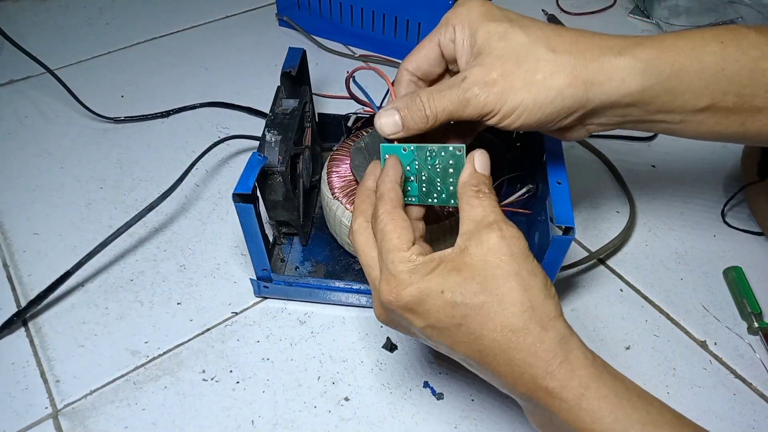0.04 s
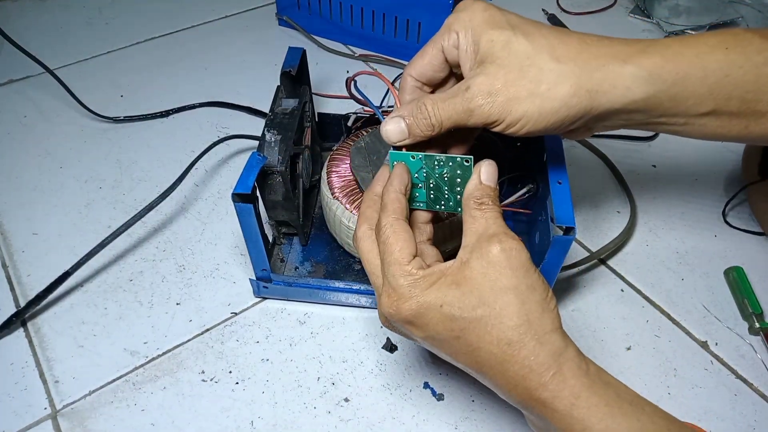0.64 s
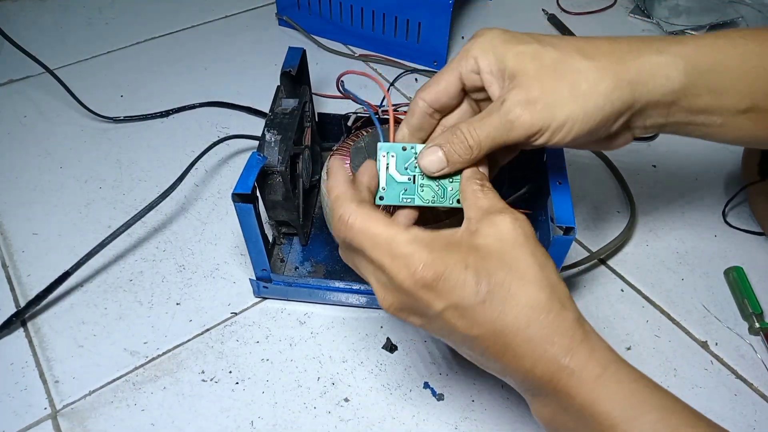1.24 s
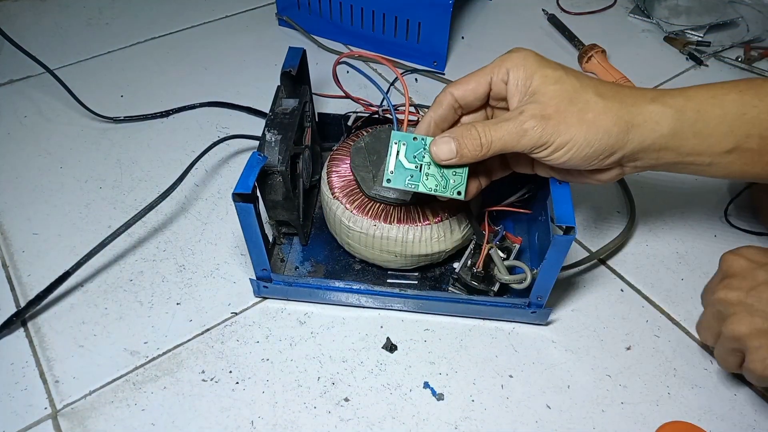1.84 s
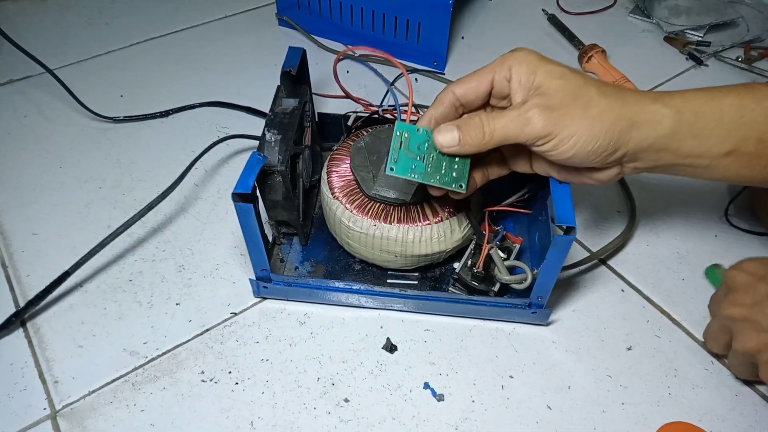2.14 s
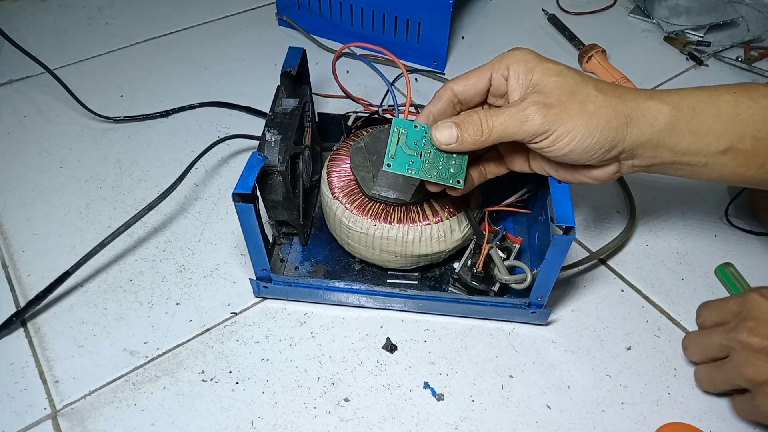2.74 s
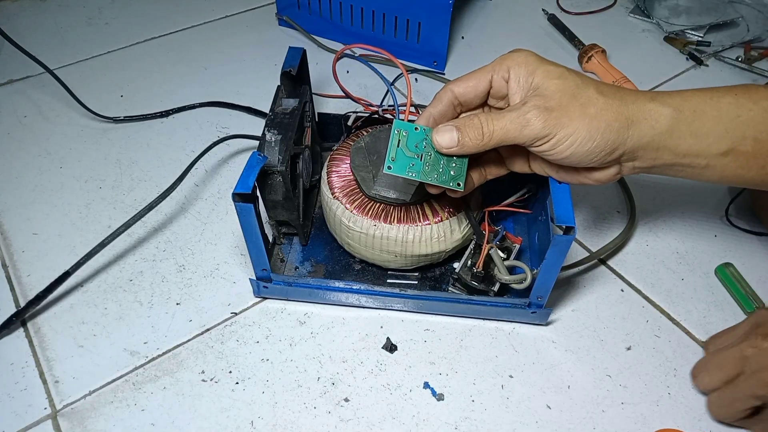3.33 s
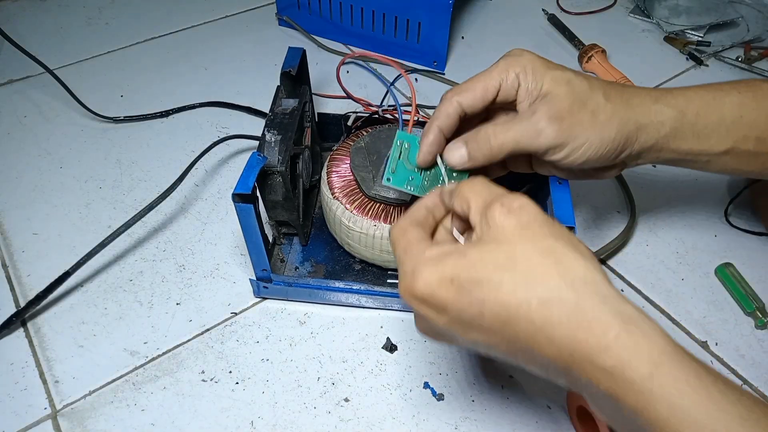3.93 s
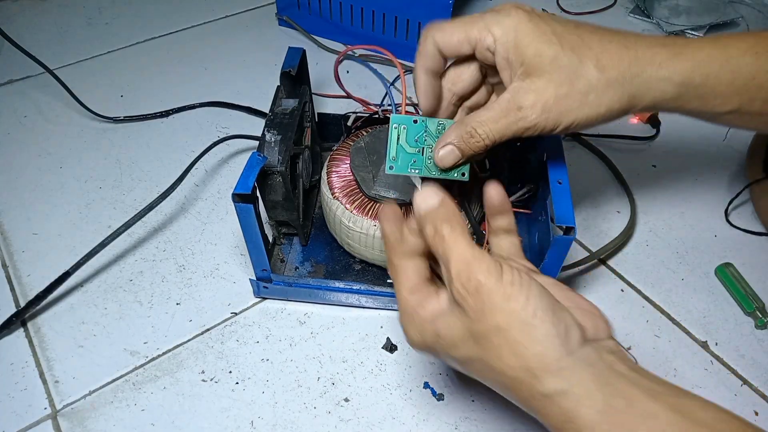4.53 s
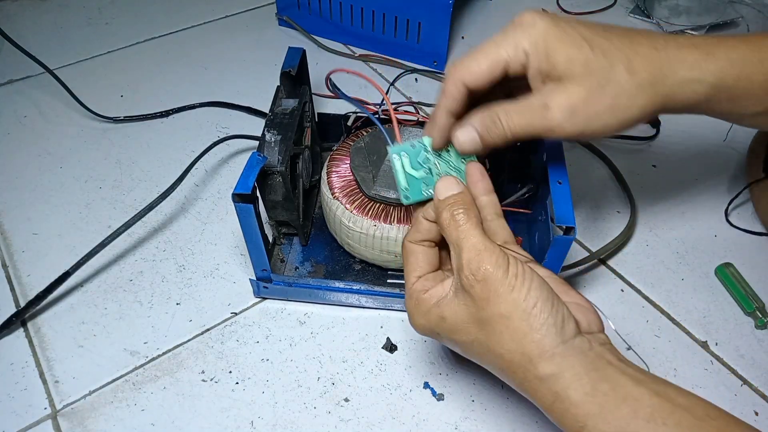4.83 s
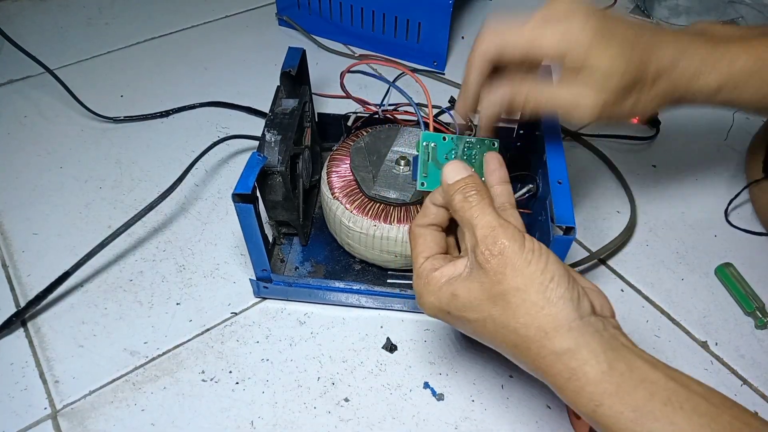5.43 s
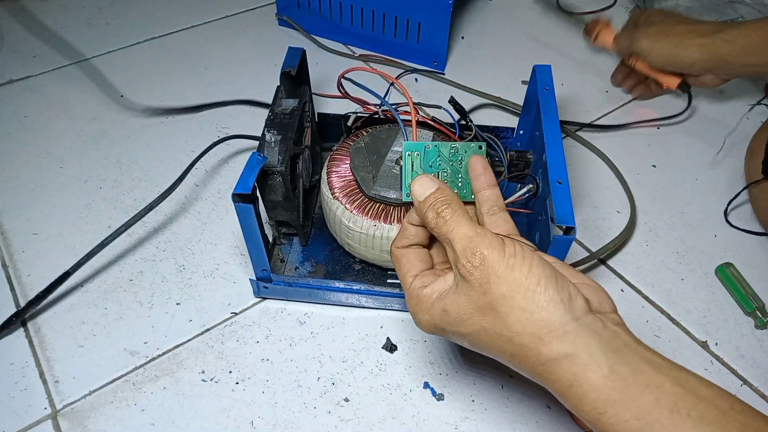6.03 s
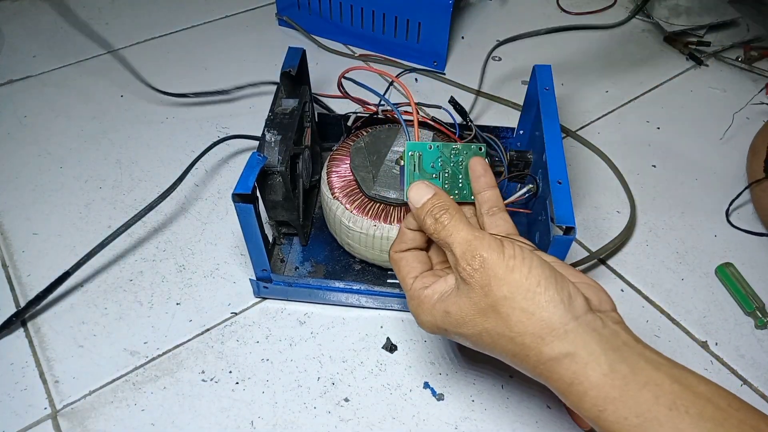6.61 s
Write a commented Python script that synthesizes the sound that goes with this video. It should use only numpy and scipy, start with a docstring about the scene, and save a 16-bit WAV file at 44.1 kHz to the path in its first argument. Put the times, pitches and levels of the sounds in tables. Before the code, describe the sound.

Fingers turn a small circuit board over with faint slides and one sharp little snap. About two seconds in, a hand tool clatters onto a tiled floor, bouncing with a brief ring, then is nudged across it in short, stuttering scrapes. Light ticks from the board, wire ends and a soldering iron follow. Arms rustle softly, and everything sounds close over the low hum of a small room.

```python
"""A hand tool clatters onto the tiled floor of a small room and is pushed, stuttering, over the glaze.
It is repair work: a circuit board is turned over above an open amplifier case, and board, wires and
soldering iron tick. Each contact is a burst of noise with ringing modes; scrapes are tiny friction slips.
Fingers slide, squeak and bump softly, and arms rustle over a quiet room tone."""
import sys
import numpy as np
from scipy import signal
from scipy.fft import rfft, irfft, next_fast_len
from scipy.io import wavfile

SR = 44100
rng = np.random.default_rng(int(sys.argv[2]) if len(sys.argv) > 2 else 0)


def persist_wave(psi):
    """Save psi, clipped to +-1, as 16-bit WAV."""
    counts = np.round(np.clip(psi, -1, 1) * 32767).astype(np.int16)
    wavfile.write(sys.argv[1], SR, np.atleast_2d(counts).T)


N = 293970
TIME = np.arange(N) / SR

# The tool's ring, struck or scraped. Each row: pitch in Hz, relative level in dB, t60 in seconds.
TOOL_MODES = [(246.4, -1, 0.15), (320.3, -2, .25), (352, 3.5, 0.155), (634, -12, 0.13), (1207, -7.5, 0.15),
              (1778, -9, .17), (2151, -6.5, 0.18), (2248, -11, 0.18), (2270, -5.5, 0.22),
              (2480, -5, 0.1615), (2656, 6.5, 0.12), (3000, -2, 0.17), (3100, -3.5, 0.211),
              (3140, -6.5, 0.12), (3305, -0.5, .18), (3450, 5, 0.099), (3580, -9.5, 0.15),
              (3770, -4.5, 0.179), (4113, -4, 0.14), (4580, -8, 0.14), (5820, -8.5, .15),
              (7810, 3.5, 0.068), (9200, 3.5, .06), (9550, 5, .08), (10080, 3, .13), (10595, -6, 0.1315),
              (11005, -4, 0.12), (12980, -11.5, .08), (15080, -4.5, 0.063)]


def tool_clatter():
    """The tool bounces on the tiles and rings; its handle clacks lower than its shaft."""
    # Each row: start in seconds, thud, clack and treble splash in relative dB, burst t60 in seconds,
    # clack centre in Hz, ring against the burst in dB.
    knocks = [(2.148, -41, -31.5, -56, 0.03, 2100, -29), (2.1555, -39, -40, -46, 0.032, 2450, -8.5),
              (2.1782, -34.5, -33, -55, 0.032, 2260, -11.5), (2.191, -32, -26, -46, 0.019, 2150, -19),
              (2.195, -32.5, -41, -40, 0.0097, 2200, -13), (2.2203, -27, -27, -16, 0.027, 3300, -36),
              (2.2299, -49, -25, -33, 0.025, 3383, -31), (2.235, -50, -33, -45, .02, 2700, -17),
              (2.2835, -43, -35.5, -37, 0.02, 2950, -24), (2.290, -43, -40, -38, 0.021, 2820, -15.5),
              (2.3277, -45, -40, -34, 0.053, 2960, -39), (2.357, -46.5, -44, -44, 0.013, 3200, -22),
              (2.432, -48, -37.5, -25, 0.013, 2940, -19), (2.4388, -58, -34.5, -33.5, 0.022, 3050, -12.5),
              (2.773, -76, -37.5, -34.5, 0.034, 3000, -17)]
    # Tone of the burst. Each row: frequency in Hz, gain in dB.
    colour = [(70, -24.5), (140, 3), (320, -4), (560, -6), (1450, -13.5), (2200, 1.5), (3500, 6.5),
              (5400, -6.5), (7200, -3.5), (7750, 0.5), (10500, 2.5), (12100, -6.5), (13000, -4),
              (15500, -9)]
    return impacts(knocks, TOOL_MODES, colour, focus_db=10.5, focus_width_hz=720, rise_s=0.00062,
                   crack_db=6, crack_t60=0.014, hollow_db=5, thud_hz=1320, splash_hz=5726)


def tool_scrape():
    """The tool stutters over the glaze, and the slips keep its modes sounding."""
    # Each row: start in seconds, hold in seconds, relative level in dB.
    pushes = [(2.61, 0.061, -57.5), (3.0, 0.042, -56.5), (3.035, 0.046, -53.5), (3.23, 0.054, -68),
              (3.365, 0.032, -57.5), (3.435, 0.03, -62.5), (3.645, .06, -53), (3.728, 0.0073, -49)]
    # Tone of the scrape. Each row: frequency in Hz, gain in dB.
    colour = [(1200, -43), (2100, -6.5), (2500, -12.5), (3150, -0.5), (3600, -5.5), (4200, -14),
              (5700, -21.5), (8200, -20), (9300, -4.5), (9900, -10), (10600, -15.5), (12500, -18.5),
              (15500, -26)]
    stutter_db = 6.5 * np.tanh(rms_one(band(rng.standard_normal(N), [40, 220], "band")))
    slips = grains(per_s=5000, spread_db=2.5) * from_db(stutter_db)
    ring = sum(from_db(db) * resonance(slips, hz, width_hz=45) for hz, db, _ in TOOL_MODES)
    scrape = coloured(slips + from_db(-0.5) * ring, colour)
    return envelope(pushes, rise_db_per_s=680, fall_db_per_s=750) * scrape


def part_ticks():
    """Board, wire ends and soldering iron tick and ring at each light contact."""
    # Each row: start in seconds, thud, clack and treble splash in relative dB, burst t60 in seconds,
    # clack centre in Hz, ring against the burst in dB.
    ticks = [(.82, -76, -76, -74, 0.028, 2940, -21), (2.931, -56, -67.5, -64.5, 0.051, 2170, -12),
             (3.004, -78, -66, -61, 0.046, 3040, -20), (3.444, -74, -59, -70, 0.032, 3200, -15),
             (3.638, -76, -76, -52.5, 0.018, 3300, -22), (3.7238, -67, -51, -56, 0.03, 3100, -7.5),
             (3.809, -77, -50.5, -53, 0.026, 3650, -25), (3.959, -51, -52.5, -64.5, 0.019, 2160, -22),
             (3.977, -61.5, -63, -65, 0.069, 2200, -17), (4.512, -78.5, -57, -50.5, 0.015, 3000, -28),
             (4.92, -77, -68.5, -73, 0.024, 2920, -27), (5.909, -81, -68, -67.5, 0.019, 2940, -18),
             (6.243, -70, -41, -49.5, 0.043, 2820, -9), (6.51, -58.5, -47.5, -64, 0.031, 2290, -33),
             (6.541, -57, -56.5, -61, 0.015, 3900, -11.5), (6.586, -68, -44.5, -73, 0.014, 2500, -24)]
    # Ring of the small parts. Each row: pitch in Hz, relative level in dB, t60 in seconds.
    modes = [(147, 11, 0.14), (320.7, 12.5, 0.21), (505, 10, 0.28), (2180, 15, 0.14), (2410, 13, 0.15),
             (2580, 13, 0.14), (2816, -8, 0.22), (2980, 17.5, 0.037), (4748, 4.5, 0.081), (7900, -9, 0.042),
             (8700, 2, 0.17), (9430, -5, 0.23), (11800, -18, 0.13)]
    # Tone of the burst. Each row: frequency in Hz, gain in dB.
    colour = [(60, 9), (150, 21), (480, 15), (1500, -15.5), (2200, -6), (2900, -4), (4000, -4.5),
              (6000, -14.5), (8000, -9.5), (9400, -0.5), (11000, -11), (15500, -17)]
    return impacts(ticks, modes, colour, focus_db=15, focus_width_hz=320, rise_s=0.0063,
                   crack_db=10, crack_t60=0.021, hollow_db=3.5, thud_hz=1230, splash_hz=5740)


def impacts(rows, modes, colour, focus_db, focus_width_hz, rise_s, crack_db, crack_t60,
            hollow_db, thud_hz, splash_hz):
    """Hard contacts: short-lived modes blur into a burst, and long modes ring at chance strengths."""
    out, t = np.zeros(N), TIME[:SR // 3]
    hz, mode_db, mode_t60 = np.transpose(modes)[:, :, None]
    partials = np.sin(2 * np.pi * hz * t) * decay(t, mode_t60)
    for start, thud_db, clack_db, splash_db, t60, centre_hz, ring_db in rows:
        burst = coloured(rng.standard_normal(len(t)), colour) * decay(t, t60) * (1 - np.exp(-t / rise_s))
        # the highest modes spend themselves in a brief crack
        burst += from_db(crack_db) * band(burst, splash_hz, "high", order=1) * decay(t, crack_t60)
        strengths = from_db(mode_db + rng.normal(0, 2.7, hz.shape)) * rng.choice([-1, 1], hz.shape)
        ring = np.sum(strengths * partials, axis=0)
        # the struck spot favours one region of the spectrum
        burst += from_db(focus_db) * resonance(burst, centre_hz, focus_width_hz)
        ring += from_db(focus_db) * resonance(ring, centre_hz, focus_width_hz)
        # weight and hardness balance bass, mids and treble; the bass rings hollow
        bands = ((thud_db, ring_db + hollow_db, thud_hz, "low"),
                 (clack_db, ring_db, [thud_hz, splash_hz], "band"),
                 (splash_db, ring_db - 3, splash_hz, "high"))
        for level_db, tail_db, edges, kind in bands:
            attack, tail = (band(x, edges, kind, order=4) for x in (burst, ring))
            attack /= np.std(attack[:SR // 200])
            tail /= np.std(tail[:SR // 25])
            add(out, start, from_db(level_db) * (attack + from_db(tail_db) * tail))
    return out


def tool_settle(start_s, hz, t60):
    """The tool's weight lands on the floor: a swing damped so fast that only a faint tick is heard."""
    out, t = np.zeros(N), TIME[:SR // 5]
    add(out, start_s, np.sin(2 * np.pi * hz * t) * decay(t, t60))
    return out


def pin_snap(start_s, hz, t60):
    """A solder pin snaps off a fingernail: a sharp-edged pip of three modes, damped by the grip."""
    out, t = np.zeros(N), TIME[:SR // 10]
    pip = sum(sign * np.sin(2 * np.pi * hz * ratio * t) for ratio, sign in ((.82, 1), (.97, -1), (1.13, 1)))
    pip *= decay(t, t60) * (1 - decay(t, 0.00056))
    add(out, start_s, band(pip, [2000, 3400], "band") + from_db(-3) * band(pip, 5100, "high"))
    return out


def finger_slides():
    """Skin catches and lets go on board, wires and cable: fine grains under an uneven grip."""
    # Each row: start in seconds, hold in seconds, level in dB.
    slides = [(0, 0.079, -78), (1.115, .14, -76.5), (1.403, 0.0059, -69), (1.498, 0.011, -70.5),
              (1.59, 0.091, -70), (2.025, 0.016, -77), (3.8, 0.026, -70), (3.89, 0.0087, -69),
              (4.085, 0.011, -77), (4.355, 0.04, -79.5), (4.465, .14, -81), (4.505, 0.013, -68),
              (4.755, 0.072, -73), (4.92, .05, -77.5), (5.275, .015, -81.5), (5.585, 0.015, -75),
              (5.94, 0.041, -63.5), (6.01, 0.075, -72.5), (6.125, 0.024, -69), (6.26, .17, -65.5),
              (6.46, 0.025, -63.5), (6.585, 0.008, -59.5), (6.645, .025, -67)]
    # Tone of sliding skin. Each row: frequency in Hz, gain in dB.
    colour = [(1500, -8.5), (3000, 0), (5500, -12), (8000, -9), (9400, 2), (11000, -11), (13000, -12.5),
              (15500, -19)]
    grip_db = 2 * rms_one(band(rng.standard_normal(N), [10, 60], "band", order=2))
    slips = grains(per_s=3300, spread_db=2.5) * from_db(grip_db)
    return envelope(slides, rise_db_per_s=789, fall_db_per_s=437) * coloured(slips, colour)


def finger_squeak(start_s, hold_s, level_db, low_hz, top_hz, arch_s):
    """A finger slips off the board: a thin squeak whose pitch arches with the finger's speed."""
    arch = np.exp(-((TIME - start_s - hold_s / 2) / arch_s) ** 2)
    glide_hz = low_hz + (top_hz - low_hz) * arch
    jitter = 1 + .012 * rms_one(band(rng.standard_normal(N), 900, "low"))
    phase = 2 * np.pi * np.cumsum(glide_hz * jitter) / SR
    tone = np.sin(phase) + .35 * np.sin(1.06 * phase) + .4 * np.sin(1.295 * phase)
    return envelope([(start_s, hold_s, level_db)], rise_db_per_s=290.5, fall_db_per_s=400) * tone


def finger_drag(start_s, hold_s, level_db, width_hz):
    """A fingertip drags on the board; friction keeps a few narrow resonances whistling."""
    # Each row: pitch in Hz, relative level in dB.
    partials = [(3700, 1), (7400, -14), (8750, -6.5)]
    rub = rng.standard_normal(N)
    whistle = rms_one(sum(from_db(db) * resonance(resonance(rub, hz, width_hz), hz, width_hz)
                          for hz, db in partials))
    return envelope([(start_s, hold_s, level_db)], rise_db_per_s=550, fall_db_per_s=150) * whistle


def hand_bumps():
    """Hand meets board with a soft, hollow bump; flesh gives way, so it swells before it dies."""
    # Each row: start in seconds, relative level in dB, swell in seconds, t60 in seconds.
    bumps = [(1.341, -64.5, 0.013, 0.22), (2.039, -52.5, 0.001, 0.091), (2.514, -59.5, 0.0065, 0.27),
             (3.329, -65.5, 0.013, 0.079), (5.04, -63.5, 0.024, 0.13)]
    # The hollow tone. Each row: frequency in Hz, gain in dB.
    colour = [(100, -4), (165, 0.5), (420, -13.5), (600, 0.5), (760, -5), (900, -1.5), (1200, -14),
              (1420, -8.5), (1650, -9.5), (2100, -15), (4000, -31.5), (8000, -52)]
    out, t = np.zeros(N), TIME[:SR // 2]
    for start, level_db, swell_s, t60 in bumps:
        shape = decay(t, t60) * (1 - np.exp(-t / swell_s))
        body = coloured(rng.standard_normal(len(t)), colour)
        add(out, start, from_db(level_db) * shape / shape.max() * body)
    return out


def arm_rustle():
    """Arms shift and reach with a dull rustle that stirs the room's standing waves."""
    # Each row: start in seconds, hold in seconds, level in dB.
    reaches = [(.04, 0.08, -67), (.22, 0.11, -69.5), (.43, 0.27, -78.5), (.97, 0.15, -69.5),
               (1.18, 0.34, -67), (1.65, 0.11, -60.5), (1.83, 0.055, -66), (2.45, 0.12, -56),
               (2.6, 0.068, -61.5), (2.78, .17, -66), (3.03, 0.041, -60), (3.18, 0.075, -67.5),
               (3.36, 0.039, -60.5), (3.52, 0.37, -66), (3.8, 0.042, -63.5), (3.96, 0.022, -60.5),
               (4.24, .02, -72), (4.52, 0.46, -68), (5.06, 0.072, -62.5), (5.2, 0.17, -72.5),
               (5.84, 0.025, -64), (5.95, 0.094, -59.5), (6.22, .45, -63)]
    # Tone of the rustle. Each row: frequency in Hz, gain in dB.
    colour = [(30, -43), (62, 1), (90, -10), (140, 3.5), (230, -5), (350, -3), (600, -3), (1000, -10),
              (1500, -18), (2800, -10), (4500, -26.5), (8000, -67)]
    # Each row: frequency in Hz, width in Hz, gain in dB.
    standing_waves = [(64, 16, 14.5), (139, 27, 6), (203.5, 8.6, 9.5), (268, 33, 4), (341.4, 12, 6.5),
                      (451, 8, -1), (508.5, 9.2, 0.5), (630, 8.6, -3)]
    rustle = coloured(rng.standard_normal(N), colour)
    boom = sum(from_db(db) * resonance(rustle, hz, width) for hz, width, db in standing_waves)
    return envelope(reaches, rise_db_per_s=248, fall_db_per_s=146.5) * rms_one(rustle + boom)


def room(x, early_db, early_t60, late_db):
    """Adds dense reflections off floor and case, then a faint tail that lingers in the low mids."""
    # Each row: frequency in Hz, t60 in seconds.
    tail_times = [(100, 0.31), (400, 0.79), (1500, 0.29), (4000, 0.35), (10000, 0.42), (16000, 0.13)]
    t = TIME[:SR]
    early = rng.standard_normal(len(t)) * decay(t, early_t60) * (t > .003)
    edges = np.geomspace(50, 18000, num=9)
    late = np.zeros(len(t))
    for low, high in zip(edges, edges[1:]):
        t60 = at_hz(tail_times, np.sqrt(low * high))
        late += band(rng.standard_normal(len(t)), [low, high], "band") * decay(t, t60) * (t > .012)
    response = from_db(early_db) * early / np.linalg.norm(early)
    response += from_db(late_db) * late / np.linalg.norm(late)
    return x + signal.fftconvolve(x, response)[:N]


def room_tone(level_db):
    """The room's steady low rumble and faint hiss."""
    # Each row: frequency in Hz, gain in dB.
    colour = [(15, -63), (25, -35.5), (47, -12), (70, -5.5), (137, -9), (180, -14.5), (212, -10.5),
              (309, -16.5), (416, -20), (476, -17.5), (1370, -27.5), (3620, -25.5), (5430, -42.5),
              (8830, -44.5), (16000, -49)]
    return from_db(level_db) * coloured(rng.standard_normal(N), colour)


def grains(per_s, spread_db):
    """Tiny slips of friction, at random and of uneven size."""
    sizes = from_db(spread_db * np.minimum(rng.exponential(1, N), 4)) * rng.choice([-1, 1], N)
    return sizes * (rng.random(N) < per_s / SR)


def envelope(strokes, rise_db_per_s, fall_db_per_s):
    """Gain over time: each movement swells up to its start, holds and dies away."""
    t = TIME[::40]
    power = 0
    for start, hold_s, level_db in strokes:
        before, after = np.maximum(start - t, 0), np.maximum(t - start - hold_s, 0)
        power += from_db(level_db - rise_db_per_s * before - fall_db_per_s * after) ** 2
    return np.interp(TIME, t, np.sqrt(power))


def coloured(x, colour):
    """Shape a steady signal with an EQ curve; rms 1."""
    size = next_fast_len(len(x))
    hz = np.arange(size // 2 + 1) * SR / size
    return rms_one(irfft(rfft(x, size) * from_db(at_hz(colour, hz)), size)[:len(x)])


def at_hz(points, hz):
    """Read a curve on a log-frequency axis."""
    points_hz, values = np.transpose(points)
    return np.interp(np.log(np.maximum(hz, 1)), np.log(points_hz), values)


def resonance(x, hz, width_hz):
    """Two-pole resonance with gain 1 at its peak."""
    return signal.lfilter(*signal.iirpeak(hz, hz / width_hz, fs=SR), x)


def band(x, edges_hz, kind, order=3):
    """Butterworth filter."""
    return signal.sosfilt(signal.butter(order, edges_hz, kind, fs=SR, output="sos"), x)


def decay(t, t60):
    """Fall 60 dB in t60 seconds, 1 ms at the shortest."""
    return np.exp(-np.log(1000) * t / np.maximum(t60, 1e-3))


def from_db(db):
    """Decibels to gain."""
    return 10 ** (np.asarray(db) / 20)


def rms_one(x):
    """Scale to rms 1."""
    return x / np.sqrt(np.mean(x ** 2) + 1e-20)


def add(out, start_s, sound):
    """Mix a sound in at a time."""
    i = max(int(start_s * SR), 0)
    out[i:i + len(sound)] += sound[:N - i]


def scene():
    """Tool, parts and fingers in the small room, over rustling arms and room tone; mono."""
    work = from_db(-5.5) * tool_clatter() + from_db(-2.5) * part_ticks() + from_db(-1) * tool_scrape()
    work += from_db(-38) * tool_settle(start_s=2.5, hz=171, t60=0.001)
    work += finger_slides()
    work += finger_squeak(start_s=1.685, hold_s=.035, level_db=-68,
                          low_hz=8700, top_hz=10050, arch_s=0.047)
    work += finger_drag(start_s=0.292, hold_s=0.026, level_db=-77.5, width_hz=170)
    work += from_db(-0.5) * hand_bumps()
    work = room(work, early_db=-6.5, early_t60=0.1, late_db=-12)
    snap = from_db(-36) * pin_snap(start_s=1.2387, hz=2700, t60=.008)
    snap = room(snap, early_db=-10, early_t60=0.034, late_db=-15.5)   # very close, so drier
    return (work + snap + room_tone(level_db=-69.5) + arm_rustle())[None]


def record(dry):
    """The microphone sheds the deep bass; the top is cut steeply."""
    bass_hz, cutoff_hz = 48, 16800
    thin = band(dry, bass_hz, "high")
    return signal.sosfilt(signal.cheby2(16, 60, cutoff_hz, fs=SR, output="sos"), thin)


dry = scene()
out = record(dry)
persist_wave(out)
```